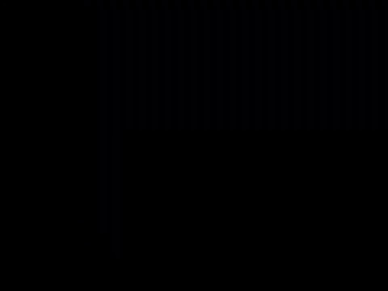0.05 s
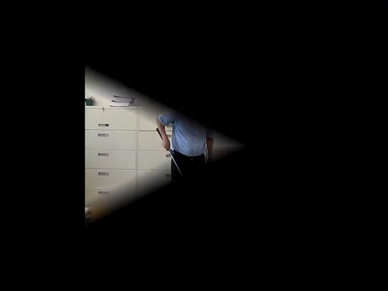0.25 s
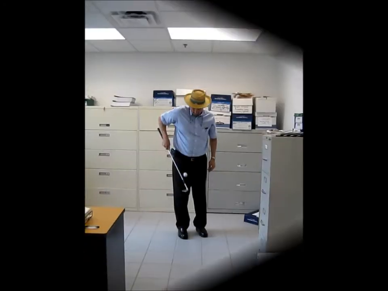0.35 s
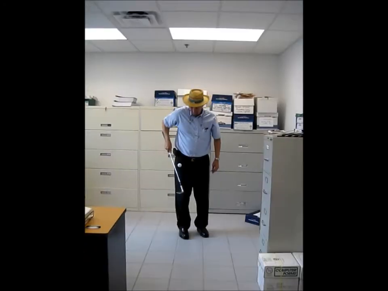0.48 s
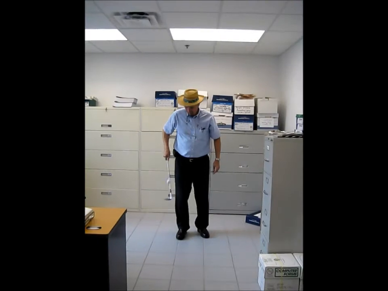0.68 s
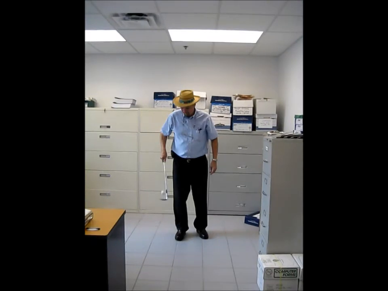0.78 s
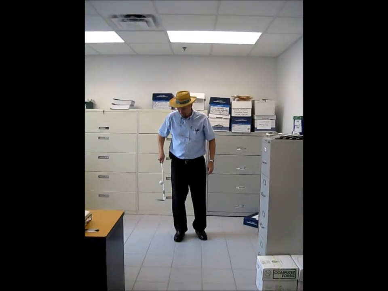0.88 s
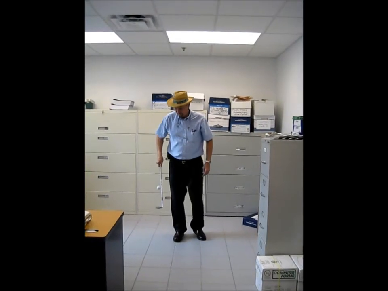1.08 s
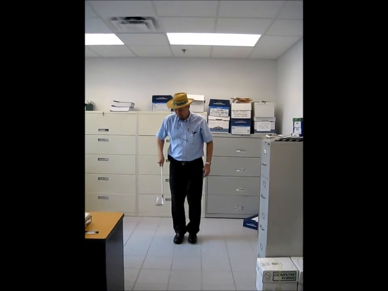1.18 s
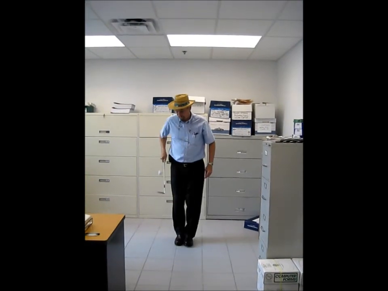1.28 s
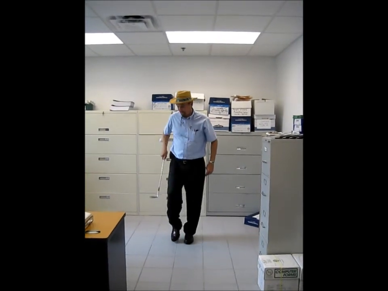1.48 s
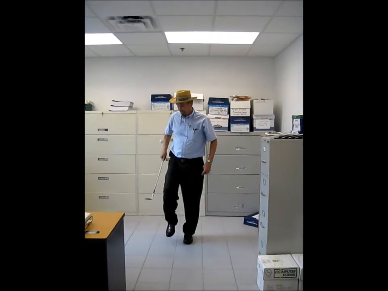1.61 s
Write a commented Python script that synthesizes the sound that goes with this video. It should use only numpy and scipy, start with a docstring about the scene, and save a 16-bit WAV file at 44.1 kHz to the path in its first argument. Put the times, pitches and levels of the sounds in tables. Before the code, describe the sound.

A club scoops up a golf ball with a tiny scrape and taps it three times, bright cracks with a short room echo. Shoes shuffle quietly on office tiles a few metres from the microphone, while ventilation hums underneath.

```python
"""Golf ball taps in an office

A club scoops up a golf ball with a scrape and taps it three times, a few metres away in a tiled office.
Each tap is a sharp crack and a brief ring of ball and iron, mirrored by the floor, spread by the room.
Shoes scuff and tread on the tiles, something ticks once, and the ventilation hums underneath."""
import sys
import numpy as np
from scipy import signal
from scipy.fft import rfft, irfft, next_fast_len
from scipy.io import wavfile

SR = 44100
rng = np.random.default_rng(int(sys.argv[2]) if len(sys.argv) > 2 else 0)


def wrap_up_sound(samples):
    """Save the sound to the file named by the first command line argument, as 16-bit audio."""
    columns = np.atleast_2d(samples).T
    # keep every value between -1 and 1, then stretch to whole-number steps
    tamed = np.clip(columns, -1, 1)
    steps = np.round(tamed * 32767).astype(np.int16)
    wavfile.write(sys.argv[1], SR, steps)


N = 72765
T = np.arange(N) / SR
FFT_SIZE = 2 * next_fast_len(N)
FREQS = np.arange(FFT_SIZE // 2 + 1) * SR / FFT_SIZE

# The bright crack of contact: (frequency [Hz], gain [dB])
CRACK_EQ = [(100, -17.5), (350, -9.5), (650, 3.5), (1500, 5.5), (2400, .5), (3800, 0), (6000, -.5),
            (9500, 3), (13000, 1.8), (16000, 1)]
# The ring of ball and club: (frequency [Hz], t60 [s], centre-hit gain [dB], edge-hit gain [dB])
RING_MODES = [(880, 0.049, -16, 7), (1057, .05, 23, 5), (1347, 0.065, 17.5, -5), (1615, .08, 8, 25),
              (1790, 0.02, 10, 13), (2975, .014, 11, 7), (3163, .018, 11, 3), (3995, .06, -16, 13),
              (4780, .02, 2, 7), (5036, .05, 0, 15.5), (6240, 0.0095, 3.5, 6), (9950, 0.019, -14, 11.5),
              (12400, .03, 1, 4)]
# The direct path keeps the snap and leaves the low ring to the room: (frequency [Hz], gain [dB])
DIRECT_EQ = [(300, -12), (900, -3.5), (1700, -7), (2900, 2), (6000, 0), (9000, 2), (13000, 6.5)]
# One edge hit, then two near the sweet spot: (time [s], level [dB], treble tilt [dB/octave],
# ring gain [dB], off centre [0-1], direct gain [dB], floor echo lag [s])
BALL_TAPS = [(0.2533, 1.8, -.4, 0, 1, -9.5, .0028), (0.7504, 1.5, -2.3, 1.8, 0.02, -10, .0032),
             (1.1680, 1.2, .7, -1.3, .08, -9.3, .0033)]

def ball_taps():
    """Ball meets club: a crack and a ring, coloured by where on the face it lands."""
    out = 0
    for start, db, tilt, ring_db, off_centre, direct_db, floor_lag in BALL_TAPS:
        power = undb(curve(CRACK_EQ)) ** 2
        for hz, t60, centre_db, edge_db in RING_MODES:
            mode = resonance(hz, width_hz=np.log(1000) / np.pi / t60)
            mode_db = ring_db + (1 - off_centre) * centre_db + off_centre * edge_db
            power += np.abs(mode * undb(mode_db)) ** 2
        hit = minimum_phase(db + treble_tilt(tilt) + 10 * np.log10(power))
        direct = minimum_phase(direct_db + curve(DIRECT_EQ))
        floor_echo = direct * delay(floor_lag)  # hard tile reflects at full strength
        paths = direct + floor_echo + office_reverb()
        out += irfft(hit * paths * delay(start))[:N]
    return out

# The hiss of friction: (frequency [Hz], gain [dB])
FRICTION_EQ = [(200, -20), (900, -19), (2200, -8.5), (3600, 2.5), (5000, -2), (6500, -5.5), (10000, -3.5),
               (15500, -7)]
# One club scrape, then three shoe scuffs:
# (time [s], length [s], attack [s], level [dB], treble tilt [dB/octave])
SCRAPES_AND_SCUFFS = [(0.223, 0.022, .004, -31, 1.5), (0.474, .052, 0.025, -36.5, -0.9),
                      (0.567, .013, .004, -45, -.2), (1.049, .025, 0.013, -48, -3.5)]

def scrapes_and_scuffs():
    """Grainy friction: a short, bright scrape as the club scoops up the ball, then shoes scuff the tile."""
    grain_db = 5
    out, room = 0, office_reverb()
    for start, length, attack, db, tilt in SCRAPES_AND_SCUFFS:
        envelope = np.clip((T - start) / attack, 0, 1) * (T < start + length)
        grains = rng.standard_normal(N) * undb(grain_db * wander(seconds=.0014))
        friction = filtered(grains, undb(curve(FRICTION_EQ) + treble_tilt(tilt)))
        out += undb(db) * envelope * unit_rms(friction)
    return filtered(out, room)

# Soft treads after the last tap: (time [s], level [dB])
FOOTSTEPS = [(1.2, -42.5), (1.27, -43), (1.495, -46)]

def footsteps():
    """Soft soles roll onto the tiles: dull, hollow swells heard through the room."""
    rise_s = .019
    out = 0
    for start, db in FOOTSTEPS:
        roll = np.maximum(T - start, 0) / rise_s
        swell = roll * np.exp(1 - roll)
        out += undb(db) * swell * noise_band(hz=477, stage_width_hz=435)
    return filtered(out, office_reverb())

# A thin, upper-mid click: (frequency [Hz], gain [dB])
TICK_EQ = [(100, -28), (1200, -11), (2500, 8.5), (5500, 2), (7500, -26), (15000, -24)]

def tick():
    """One small click with a little room behind it."""
    start_s, gain_db, reverb_db = 1.2902, -12, -4
    click = minimum_phase(gain_db + curve(TICK_EQ)) * delay(start_s)
    return irfft(click * (1 + undb(reverb_db) * office_reverb()))[:N]

# The bed of rushing air: (frequency [Hz], noise density [dB re 1/Hz])
AIR_SPECTRUM = [(8, -105), (25, -84.5), (55, -82.5), (90, -82), (160, -78), (230, -83), (400, -76.5),
                (750, -80), (1200, -77.5), (2200, -84), (3300, -85.5), (6000, -93.5), (10000, -96),
                (16000, -100.5)]
# Hollow duct resonances: (frequency [Hz], half-width of each filter stage [Hz], level [dB])
DUCT_MODES = [(311, 21, -59.5), (386.1, 17, -52), (475.7, 24, -55.5), (522.7, 23, -53.5), (603, 38, -57)]
# Steady hum and whine: (frequency [Hz], level [dB])
HUM_TONES = [(58, -65.5), (387, -61), (13750, -76.5)]

def ventilation():
    """Rushing air flutters gently and rings the ducts, over a low hum and a thin electrical whine."""
    flutter_db = .53
    air = filtered(rng.standard_normal(N), undb(curve(AIR_SPECTRUM))) * np.sqrt(SR / 2)
    ducts = sum(undb(db) * noise_band(hz, 2 * half_width) for hz, half_width, db in DUCT_MODES)
    hum = 0
    for hz, db in HUM_TONES:
        hum += undb(db) * np.sqrt(2) * np.sin(2 * np.pi * (hz * T + rng.random()))
    flutter = undb(flutter_db * wander(seconds=.06))
    return air * flutter + ducts + hum

# The room's tail, where lows bloom late and linger: (frequency [Hz], t60 [s], build-up [s])
REVERB_BANDS = [(300, .55, .008), (1000, 0.33, .004), (3000, .41, .001), (6000, .37, .002),
                (14000, .31, .002)]

def office_reverb():
    """The room's frequency response: hard echoes off cabinets, an early wash and a tail."""
    early_db, early_t60_s = -4, .1
    echo_db, first_echo_s, echo_span_s = -15.5, .0055, .016
    noise, impulse = rng.standard_normal(N), 0
    for hz, t60, build_s in REVERB_BANDS:
        band = curve([(centre, float(centre == hz)) for centre, _, _ in REVERB_BANDS])
        decay = undb(-60 * T / t60) + undb(early_db - 60 * T / early_t60_s)
        bloom = 1 - np.exp(-T / build_s)
        impulse += filtered(noise, band) * decay * bloom
    impulse /= np.linalg.norm(impulse)
    for lateness, strength in rng.random((8, 2)):
        arrival = int((first_echo_s + lateness * echo_span_s) * SR)
        impulse[arrival] += undb(echo_db) * (.5 + strength) * (1 - lateness / 2)
    return rfft(impulse / np.linalg.norm(impulse), FFT_SIZE)

def undb(db):
    """Decibels to amplitude."""
    return 10 ** (np.asarray(db) / 20)

def curve(points):
    """Join (frequency [Hz], value) points on a log-frequency axis."""
    hz, value = np.array(points).T
    return np.interp(np.log(FREQS + 1), np.log(hz), value)

def minimum_phase(db):
    """The response with the tightest attack for this EQ curve."""
    cepstrum = irfft(np.log(undb(db)))
    cepstrum[1:FFT_SIZE // 2] *= 2
    cepstrum[FFT_SIZE // 2 + 1:] = 0
    return np.exp(rfft(cepstrum))

def filtered(x, response):
    """Play a sound through a frequency response."""
    return irfft(rfft(x, FFT_SIZE) * response)[:N]

def delay(seconds):
    """Response of a pure delay."""
    return np.exp(-2j * np.pi * FREQS * round(seconds * SR) / SR)

def resonance(hz, width_hz):
    """Response of one mode, gain 1 at its centre."""
    return 1j * FREQS * width_hz / (hz ** 2 - FREQS ** 2 + 1j * FREQS * width_hz)

def treble_tilt(db_per_octave, corner_hz=1700):
    """An EQ curve in dB that brightens or dulls the highs."""
    return db_per_octave * np.log2(np.maximum(FREQS / corner_hz, 1))

def unit_rms(x):
    """Scale a signal to a spread of 1."""
    return x / np.std(x)

def noise_band(hz, stage_width_hz):
    """Hollow, pitched noise from two resonant stages in series."""
    return unit_rms(filtered(rng.standard_normal(N), resonance(hz, stage_width_hz) ** 2))

def wander(seconds):
    """Smooth random modulation on this time scale."""
    return unit_rms(filtered(rng.standard_normal(N), np.exp(-(2 * FREQS * seconds) ** 2)))

def scene():
    """The mono mix: taps in front, scrape, shoes and tick behind, ventilation underneath."""
    return (ball_taps() + scrapes_and_scuffs() + footsteps() + tick() + ventilation())[None]

def record(dry):
    """Silence for a moment, then a small camera notches the treble deeply and cuts the very top."""
    sound_start_s, cutoff_hz = .164, 15850
    notch_hz, notch_width_hz, notch_db = 7910, 980, -35
    dip = np.exp(-np.abs(FREQS - notch_hz) / notch_width_hz)
    notch = minimum_phase(20 * np.log10(1 - dip * (1 - undb(notch_db))))
    notched = filtered(dry[0] * (T >= sound_start_s), notch)
    high_cut = signal.ellip(10, .2, 80, cutoff_hz, fs=SR, output="sos")
    return signal.sosfilt(high_cut, notched)[None]

dry = scene()
out = record(dry)
wrap_up_sound(out)
```